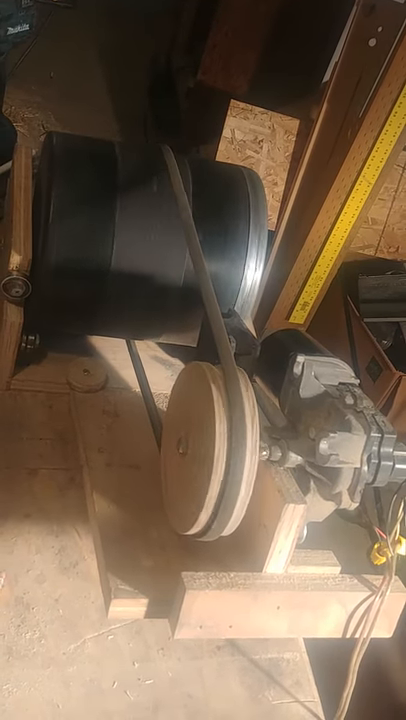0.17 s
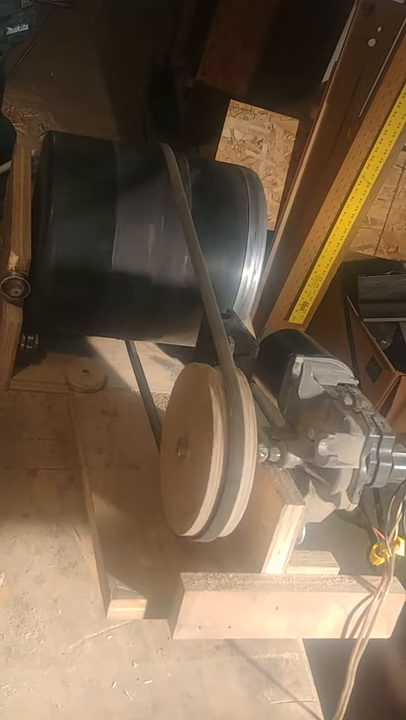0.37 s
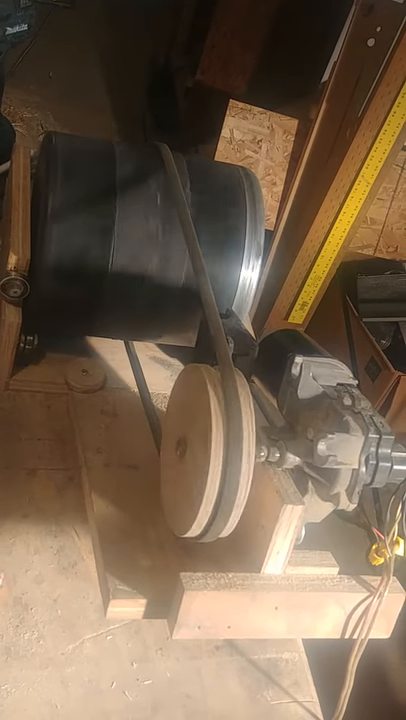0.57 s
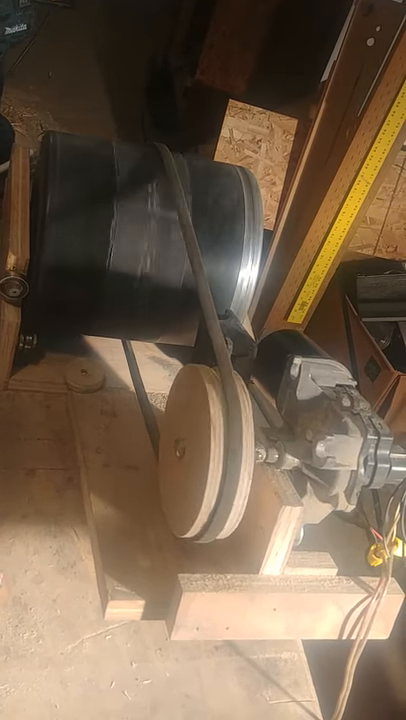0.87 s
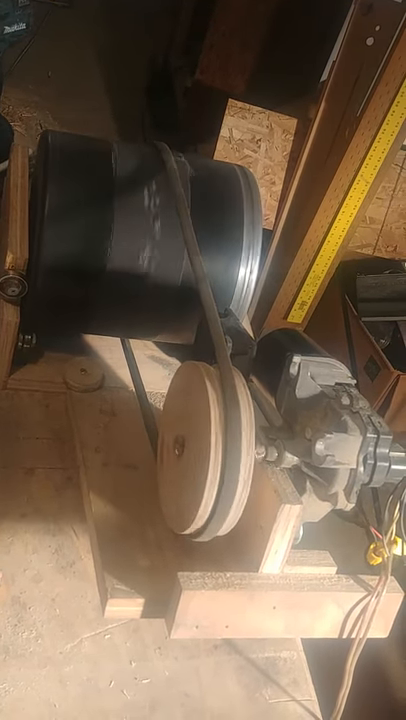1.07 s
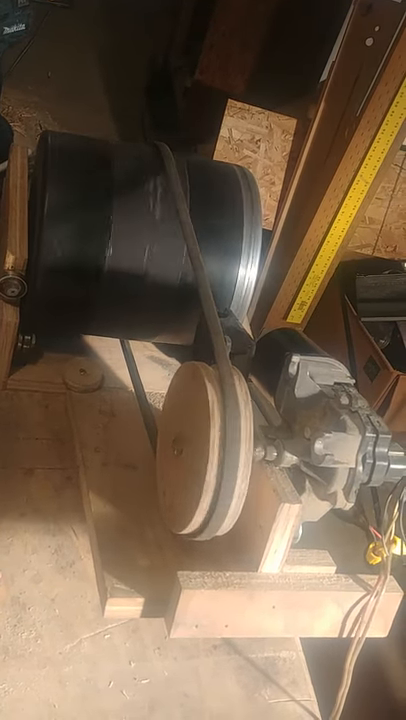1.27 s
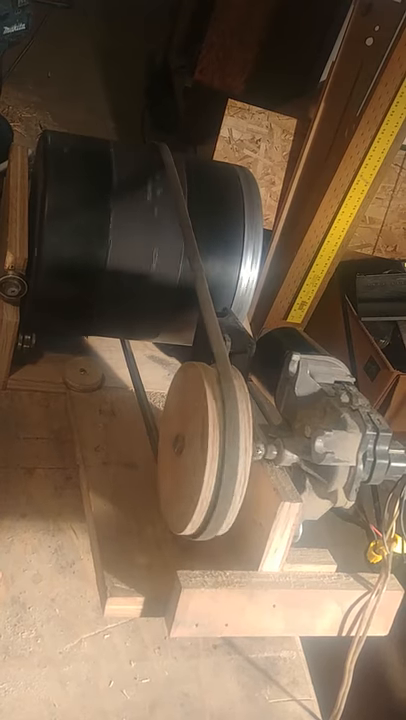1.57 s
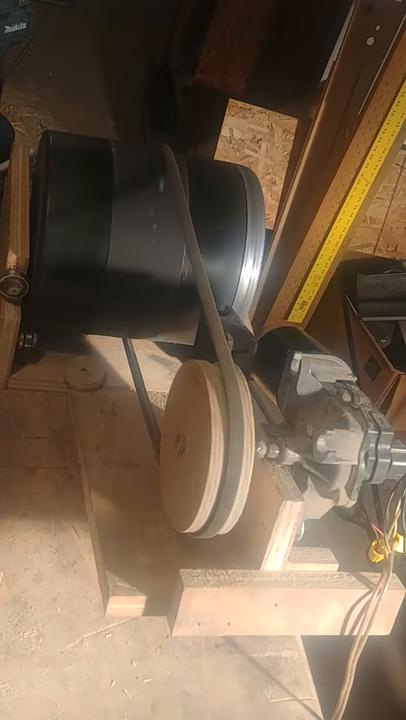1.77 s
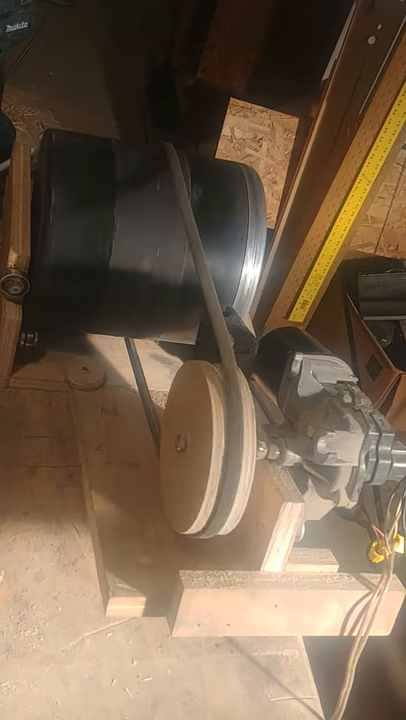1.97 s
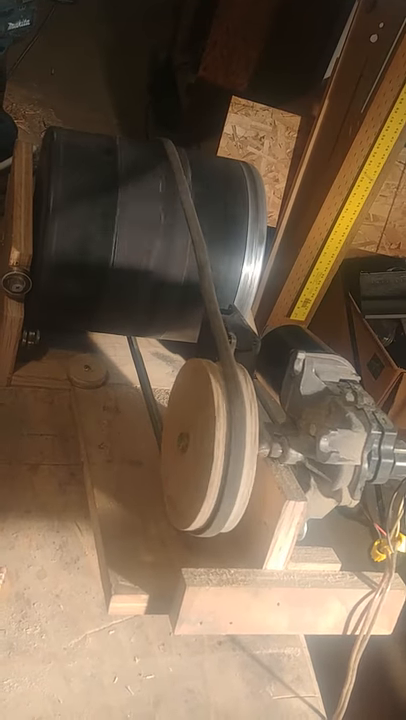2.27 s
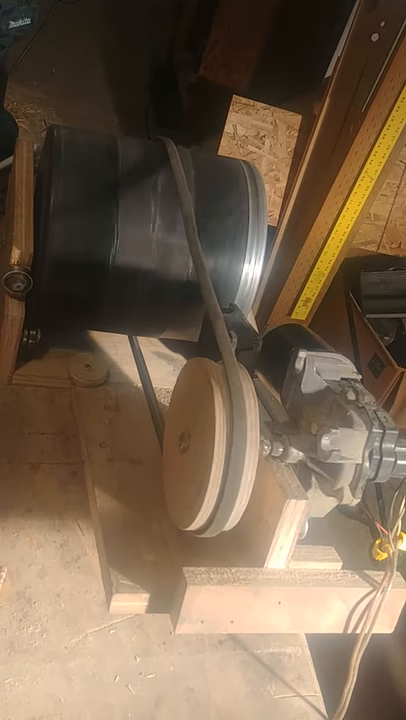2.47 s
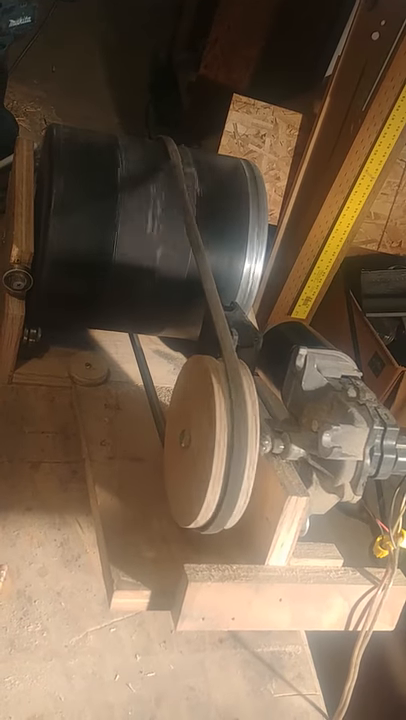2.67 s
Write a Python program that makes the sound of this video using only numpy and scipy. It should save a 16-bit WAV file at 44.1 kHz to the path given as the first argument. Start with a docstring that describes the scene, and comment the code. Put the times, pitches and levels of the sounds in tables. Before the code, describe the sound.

A belt-driven tumbler drum rolls a load of stones continuously for about 2.8 seconds. A hollow, uneven low boom and deep rumble lie under dense gritty clicking that surges several times a second, notably near 1.9. Muffled thuds fall irregularly throughout; stone clacks cluster around 0.2-0.3, the sharpest at 2.6, with a heavy thud at 2.8. Close, short workshop reverberation, soft treble, slightly left.

```python
"""A tumbler drum turns in a workshop, its rolling load of stones making it boom over a deep rumble. Boom and
churn are noise shaped by the resonances of drum and shell; heavy stones thud as swelling sines. The sliding
layer is gritty: random clicks, each with a brief ring, surge with the level of the slide. Single knocks (a
crack, decaying modes and an early echo off floor or wall) and bright chinks (noise bursts) stand out of it. The
stereo image is alike in the bass, unrelated in the treble and a little to the left; hiss is faint."""
import sys
import numpy as np
from scipy import signal
from scipy.fft import rfft, irfft, next_fast_len
from scipy.io import wavfile
from scipy.ndimage import uniform_filter1d, map_coordinates

SR = 44100
rng = np.random.default_rng(int(sys.argv[2]) if len(sys.argv) > 2 else 0)


def transcribe(signal):
    """Save signal, clipped to [-1, 1], as a 16-bit WAV file at the path in sys.argv[1]."""
    frames = np.atleast_2d(signal).T
    limited = np.clip(frames, -1, 1)
    pcm = np.round(limited * 32767).astype(np.int16)
    wavfile.write(sys.argv[1], SR, pcm)


N = 124803  # length [samples]

# how hard the load slides: (time [s], relative level [dB])
SLIDE = [(0, -32.5), (.14, -38), (.28, -35), (.34, -41), (.39, -36), (.47, -34.5), (.54, -39), (.68, -36),
         (.76, -33), (.82, -37), (.87, -30.5), (.91, -37.5), (.97, -31.5), (1.08, -37), (1.17, -32),
         (1.3, -37.5), (1.36, -34.5), (1.42, -38), (1.47, -31), (1.56, -35.5), (1.62, -31.5), (1.67, -35.5),
         (1.74, -35), (1.81, -34.5), (1.9, -28), (1.97, -36.5), (2.1, -35.5), (2.22, -41.5), (2.32, -36),
         (2.41, -31.5), (2.47, -37), (2.52, -31), (2.59, -41), (2.67, -32), (2.73, -39), (2.8, -29.5)]
# the recorder's treble roll-off: (frequency [Hz], gain [dB])
ROLL_OFF = [(7800, 0), (8400, -9), (9300, -25.5), (10500, -74.5)]


def amp(db):
    """Amplitude ratio: 20 dB is a factor of ten."""
    return 10 ** (np.asarray(db) / 20)


def unit(x):
    """Normalisation: scale a signal to rms 1."""
    return x / np.sqrt(np.mean(x ** 2) + 1e-20)


def along(points, hz):
    """Logarithmic pitch scale: interpolate (frequency [Hz], value) points on a log axis."""
    f, v = np.transpose(points)
    return np.interp(np.log(hz + 1), np.log(f + 1), v)


def curve(rows):
    """Envelope: interpolate (time [s], value) rows to one value per sample."""
    return np.interp(np.arange(N) / SR, *np.transpose(rows))


def wobble(rate):
    """Slow random modulation: a smooth curve through `rate` random knots a second."""
    knots = rng.standard_normal(400)
    return map_coordinates(knots, [np.arange(N) * rate / SR], mode="mirror")


def filtered(x, response):
    """Linear filtering: multiply the spectrum by a function of frequency."""
    size = next_fast_len(N + SR // 2)
    hz = np.fft.rfftfreq(size, 1 / SR)
    return irfft(rfft(x, size) * response(hz), size)[..., :N]


def coloured(x, points):
    """Spectral shaping that keeps the power of white noise within the recorder's band."""
    def response(hz):
        gain = amp(along(points, hz))
        recorded = gain * amp(along(ROLL_OFF, hz))
        return gain / np.sqrt(np.mean(recorded ** 2))
    return filtered(x, response)


def ringing(x, modes):
    """Resonance: damped modes whose powers add, applied as a zero-phase filter."""
    def response(f):
        power = 0
        for centre, width, db in modes:
            mode = amp(db) * f * width / (centre * centre - f * f + 1j * f * width)
            power = power + abs(mode) ** 2
        return np.sqrt(power)
    return filtered(x, response)


def noise():
    """Incoherence: two unrelated white noises."""
    return rng.standard_normal((2, N))


def strikes(rows, sound):
    """Superposition: add a fresh sound for each (time [s], level [dB], ..) row."""
    out = np.zeros((2, N + SR))
    for s, db, *rest in rows:
        one = sound(*rest)
        out[:, round(s * SR):][:, :one.shape[1]] += amp(db) * one
    return out[:, :N]


def boom():
    """Sustained resonance: the rolling load keeps the drum's low modes ringing over a deep, uneven rumble."""
    # how heavily the load rolls on the wall: (time [s], relative level [dB])
    roll = [(0, -32), (.2, -28.5), (.48, -31), (.64, -26.5), (.95, -27), (1.25, -25.5), (1.42, -27.5),
            (1.6, -25.5), (1.7, -30), (2.14, -30), (2.3, -27), (2.43, -34.5), (2.5, -27.5), (2.56, -32.5),
            (2.83, -25.5)]
    # the drum's low resonances: (frequency [Hz], width [Hz], relative level [dB])
    drum_modes = [(135, 14, -15), (166, 10, -2), (180, 12, -2), (194, 12, -1), (230, 18, -6), (272, 12, -9),
                  (315, 30, -15)]
    # spectrum shaping the drum: (frequency [Hz], relative level [dB])
    drum_band = [(60, -23), (130, -0.5), (300, -1), (600, -2), (1500, -50.5)]
    # the deep rumble: (time [s], level [dB])
    deep = [(.02, -42), (.13, -55.5), (.22, -37.5), (.37, -46.5), (.43, -35.5), (.53, -54), (.65, -45.5),
            (1.1, -50.5), (1.2, -43), (1.8, -45.5), (2.06, -43), (2.15, -60), (2.3, -39.5), (2.58, -51.5),
            (2.79, -36)]
    # spectrum of the rumble: (frequency [Hz], relative level [dB])
    deep_band = [(30, -20.5), (44, -30.5), (61, 13.5), (80, 8.5), (93, 19), (115, -4), (160, -30.5),
                 (400, -58)]
    roll_db = 1
    drum = unit(coloured(ringing(noise(), drum_modes), drum_band))
    rumble = unit(coloured(noise(), deep_band))
    return amp(curve(roll) + roll_db) * drum + amp(curve(deep)) * rumble


def patchy(x, depth_db):
    """Time-varying spectrum: the colour drifts at random as different stones come to the top."""
    z = signal.stft(x, nperseg=512)[2]
    field = rng.standard_normal(z.shape[1:])
    field = uniform_filter1d(field, size=7, axis=0)  # smooth over frequency
    field = uniform_filter1d(field, size=10, axis=1)  # smooth over time
    return signal.istft(z * amp(depth_db * unit(field)), nperseg=512)[1][:, :N]


def churn(follow=0.42, shell_db=4, flutter_db=0.52, churn_db=-30):
    """Forced vibration: countless muffled contacts ring the shell, louder as the load slides."""
    # spectrum of the muffled contacts: (frequency [Hz], relative level [dB])
    muffled = [(45, -42.5), (150, 0.5), (300, 2.5), (450, 1), (700, -11.5), (1000, 1), (1400, -7.5),
               (2500, -10), (6000, -65.5)]
    # the shell's higher resonances: (frequency [Hz], width [Hz], relative level [dB])
    shell_modes = [(386, 12, 3), (494, 7, 5), (525, 20, -3), (578, 12, -4), (620, 10, 2), (658, 22, 1),
                   (730, 20, -1), (780, 40, -4), (840, 16, 0), (936, 16, -2), (968, 22, -2), (1040, 40, -7),
                   (1154, 22, -3)]
    slide_db = curve(SLIDE)
    surge_db = follow * (slide_db - slide_db.mean())
    contacts = unit(coloured(noise(), muffled))
    shell = unit(patchy(ringing(noise(), shell_modes), depth_db=2.0))
    body = unit(contacts + amp(shell_db) * shell)
    return amp(churn_db + surge_db + flutter_db * wobble(24.37)) * body


def crack(t60, room_db):
    """Impact and reverberation: a contact's short noise burst and the workshop's slower decay."""
    room_t60 = 0.26  # [s]
    t = np.arange(SR // 2) / SR
    direct = amp(-60 * t / t60)
    room = amp(room_db - 60 * t / room_t60)
    return rng.standard_normal((2, len(t))) * np.hypot(direct, room)


def grit(flutter_db=1.04, ring_db=-8, count=32, grit_db=-0.5):
    """Random impacts: small stones of many sizes click in the sliding layer, each with its own brief ring."""
    # spectrum shaping the clicks: (frequency [Hz], relative level [dB])
    grit_band = [(100, -45), (500, -21), (1000, -13), (1450, 0.5), (2000, 0.5), (2900, 1), (3700, 0),
                 (5300, -1.5), (6700, -8.5), (7700, -5.5)]
    contacts_per_s, contact_spread_db = 700, 3.7  # rate over all stone sizes
    lowest_hz, highest_hz, pitch_scatter = 1195, 7070, 0.053  # range before the random scatter
    ring_cycles = 79  # t60 of a ring, in cycles
    clicks, t = np.zeros((2, N)), np.arange(SR // 2) / SR
    scatter = np.exp(pitch_scatter * rng.standard_normal(count))
    for hz in np.geomspace(lowest_hz, highest_hz, count) * scatter:
        hits = rng.random(N) < contacts_per_s / count / SR
        sizes = amp(contact_spread_db * np.minimum(rng.standard_normal(N), 2))
        signs = rng.choice([-1, 1], N)
        ring = np.sin(2 * np.pi * (hz * t + rng.random((2, 1)))) * amp(-60 * t * hz / ring_cycles)
        click = crack(t60=0.012, room_db=-11.5) + amp(ring_db) * ring
        clicks += signal.oaconvolve((hits * sizes * signs)[None], click, axes=1)[:, :N]
    layer = coloured(unit(patchy(clicks, depth_db=1.1)), grit_band)
    return amp(curve(SLIDE) + grit_db + flutter_db * wobble(39.54)) * layer


def through_wall(x, wall_db=-1, direct_db=0.18):
    """Structure-borne sound: hard contacts are heard both directly and as the wall's ring."""
    # the wall's bright resonances: (frequency [Hz], width [Hz], relative level [dB])
    wall_modes = [(1444, 88, -4.5), (2270, 36, -21.5), (2660, 22, -6), (2750, 13, -7)]
    return amp(direct_db) * x + amp(wall_db) * ringing(x, wall_modes)


def knocks():
    """Isolated collisions: single stones striking each other stand out of the rush."""
    # (time [s], relative level [dB], pitch of the ring [Hz])
    knock_rows = [(.016, -30, 1740), (.183, -23.5, 1453), (.245, -21, 1080), (.263, -28, 1400),
                  (.282, -26, 3600), (.459, -28, 3600), (.755, -27, 3000), (.856, -28, 2830),
                  (.948, -24, 3500), (1.164, -27, 2240), (1.446, -25.5, 1600), (1.456, -24, 2090),
                  (1.589, -24.5, 3500), (1.631, -26, 2110), (1.757, -28, 2700), (1.845, -25, 1700),
                  (1.89, -29, 1350), (2.14, -27, 4000), (2.2455, -23.5, 5000), (2.347, -26, 2750),
                  (2.6155, -17.5, 3700), (2.6405, -19.5, 4400), (2.792, -23.5, 2230)]
    return strikes(knock_rows, stone)


def stone(hz, crack_cycles=42, room_db=-14, ring_db=-4):
    """Modal ringing and an early reflection off floor or wall: big stones clack low and long, small ones snap."""
    # the stone's modes: [multiples of its pitch]
    stone_modes = [1, 1.4, 1.9, 2.2]
    # edges of the crack's band: [multiples of its pitch]
    crack_band = [0.57, 2.7]
    ring_cycles = 120  # t60 of each mode, in its own cycles
    reflection_s, reflection_db = .0037, -6
    t = np.arange(SR // 2) / SR
    ratios = np.array(stone_modes)[:, None]
    modes = hz * ratios
    edges = np.clip(hz * np.array(crack_band), 1, SR / 2 - 1)
    band = signal.butter(2, edges, "bandpass", fs=SR)

    def contact():
        burst = crack(crack_cycles / hz, room_db)
        body = signal.lfilter(*band, burst)
        phases = rng.uniform(0, 2 * np.pi, size=(2, len(modes), 1))
        decay = amp(-60 * t * modes / ring_cycles)
        ring = np.sin(2 * np.pi * modes * t + phases) * decay / ratios
        return unit(body) * burst.std() + amp(ring_db) * ring.sum(axis=1) / 2

    first = contact()
    reflection = np.pad(contact(), ((0, 0), (round(reflection_s * SR), 0)))[:, :len(t)]
    return first + amp(reflection_db) * reflection


def thuds(thud_db=-4.0):
    """Impact excitation: heavy stones land on the wall one by one."""
    # (time [s], relative level [dB])
    thud_rows = [(.092, -16), (.125, -16), (.245, -13.5), (.287, -19.5), (.331, -15.5), (.566, -14.5),
                 (.609, -12.5), (.630, -23.5), (.755, -20.5), (.812, -15.5), (.909, -17.5), (1.050, -16),
                 (1.281, -19), (1.368, -19), (1.492, -16), (1.581, -18.5), (1.732, -19.5), (1.855, -12.5),
                 (2.002, -18.5), (2.365, -21.5), (2.584, -17.5), (2.719, -14), (2.807, -10)]
    return amp(thud_db) * strikes(thud_rows, thud)


def thud(rise_s=0.0098, centre_hz=180.5, scatter=0.062):
    """Damped oscillation: a heavy stone makes the wall swing for a few cycles."""
    t = np.arange(SR // 5) / SR
    swell = t / rise_s * np.exp(1 - t / rise_s)  # peaks at rise_s
    hz = centre_hz * np.exp(scatter * rng.standard_normal())
    return (swell ** 2 * np.sin(2 * np.pi * hz * t))[None]


def chinks(chink_db=-0.5):
    """Spectral colour: small bright chinks, strongest in the treble."""
    # (time [s], relative level [dB])
    chink_rows = [(.725, -36.5), (.932, -31.5), (.96, -31), (1.008, -32.5), (1.08, -29.5), (1.59, -32.5),
                  (1.81, -33), (1.831, -30.5), (2.167, -29), (2.251, -31.5), (2.291, -31.5), (2.645, -37.5)]
    # spectrum of a chink: (frequency [Hz], relative level [dB])
    chink_band = [(500, -25.5), (2500, -13), (6700, -10.5), (7550, -4.5), (8300, -6.5)]
    return amp(chink_db) * coloured(strikes(chink_rows, chink), chink_band)


def chink(rise_s=0.00062):
    """Exponential onset and decay: a brief bright scrape that rings on."""
    burst = crack(t60=0.14, room_db=-13)
    t = np.arange(burst.shape[1]) / SR
    return burst * (1 - np.exp(-t / rise_s))


def spread(pair):
    """Interchannel coherence: left and right are alike in the bass, unrelated in the treble."""
    # the two microphones: (frequency [Hz], correlation [ratio, clipped to 1])
    alike = [(200, 1.05), (350, 0.9), (480, 0.27), (660, 0.7), (900, 0.3), (1300, 0.21), (2400, 0.08),
             (5000, 0)]

    def mid_side(hz):
        # cos^2 - sin^2 of this half angle is the correlation
        turn = np.arccos(np.clip(along(alike, hz), -1, 1)) / 2
        return np.array([np.cos(turn), np.sin(turn)])
    mid, side = filtered(pair, mid_side)
    return np.array([mid + side, mid - side])


def scene():
    """Level difference between the channels: everything in the drum is heard a little to the left."""
    # the two microphones: (frequency [Hz], left minus right gain [dB])
    balance = [(70, 5.6), (180, 1.3), (280, 4.5), (390, 2), (500, 10), (640, 1.6), (790, 3.6), (950, 3.7),
               (1300, 3.2), (2700, 2.1), (3900, 5.7), (5600, 6), (7000, 8.1), (7900, 1)]
    hard_contacts = grit() + knocks() + chinks()
    tumbler = spread(boom() + churn() + through_wall(hard_contacts)) + thuds()
    return filtered(tumbler, lambda hz: amp(np.outer([.5, -.5], along(balance, hz))))


def record(dry):
    """Band limiting: the recorder rolls off the treble, adds faint hiss and cuts all above its limit."""
    # spectrum of the hiss: (frequency [Hz], relative level [dB])
    hiss_band = [(10500, -13), (12000, 7), (15000, 9)]
    hiss_db, top_hz = -71.5, 15750
    dull = filtered(dry, lambda hz: amp(along(ROLL_OFF, hz)))
    hiss = filtered(noise(), lambda hz: amp(hiss_db + along(hiss_band, hz)))
    return filtered(dull + hiss, lambda hz: hz < top_hz)


dry = scene()
out = record(dry)
transcribe(out)
```